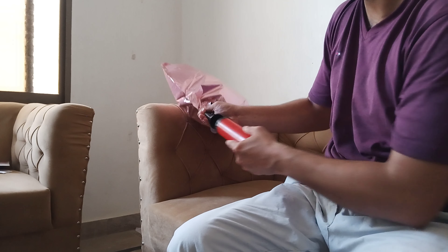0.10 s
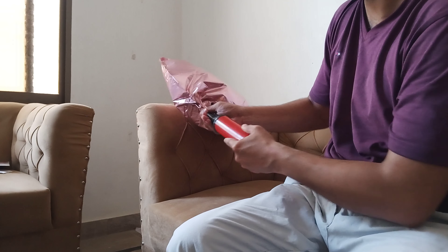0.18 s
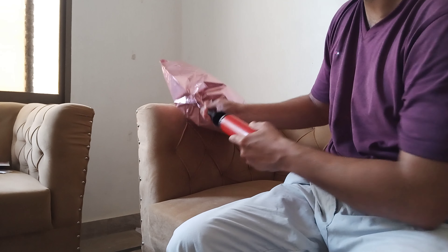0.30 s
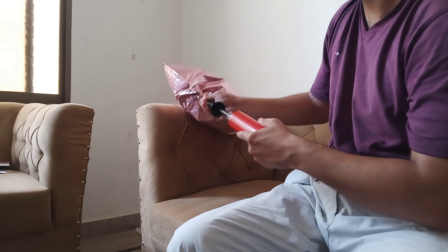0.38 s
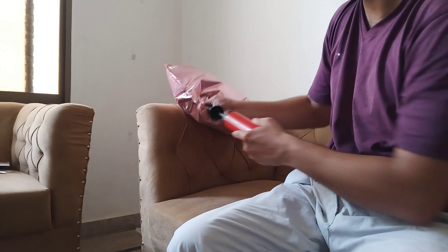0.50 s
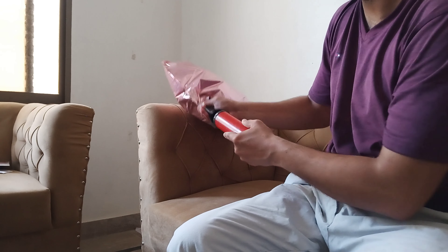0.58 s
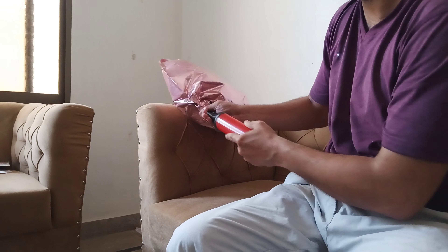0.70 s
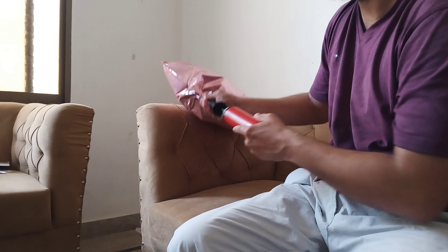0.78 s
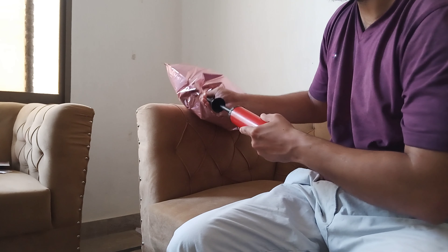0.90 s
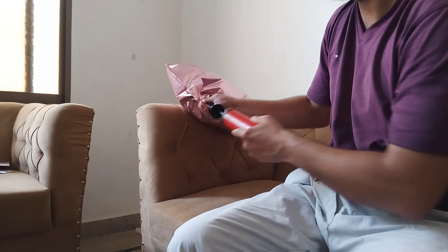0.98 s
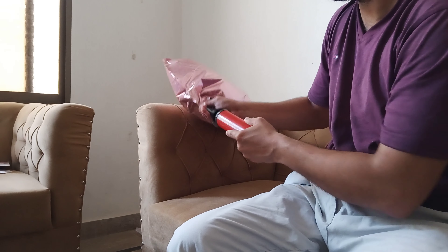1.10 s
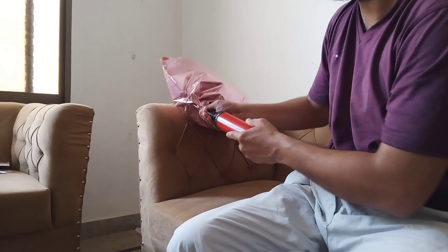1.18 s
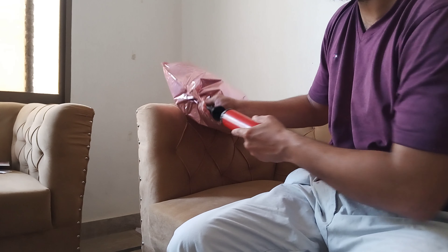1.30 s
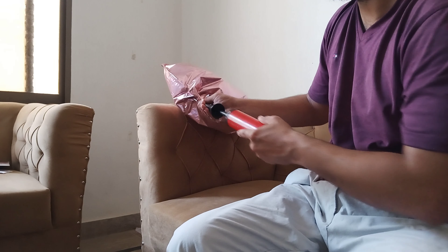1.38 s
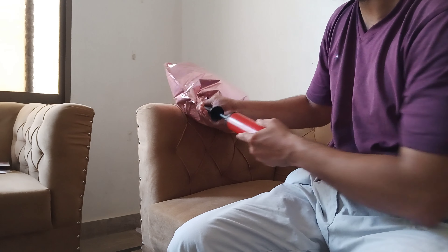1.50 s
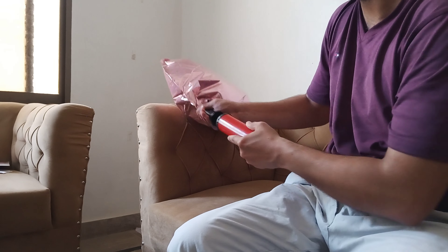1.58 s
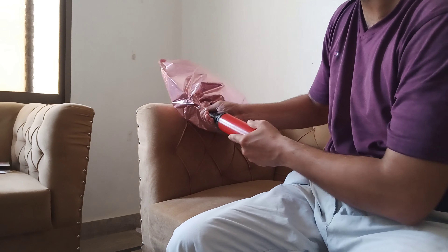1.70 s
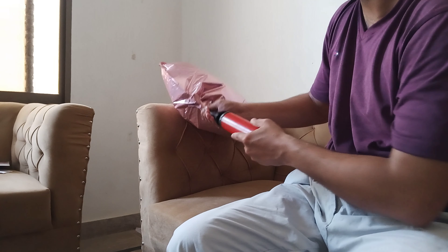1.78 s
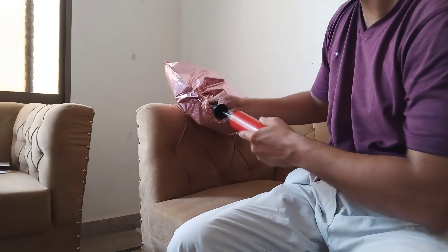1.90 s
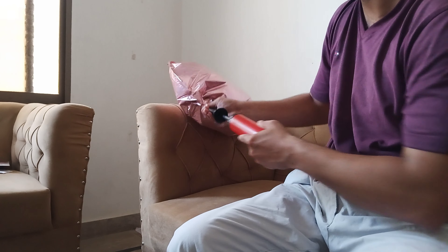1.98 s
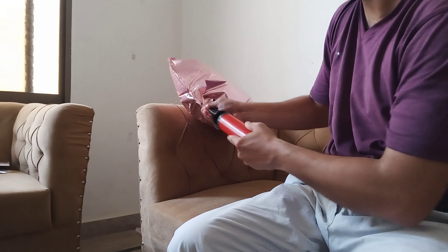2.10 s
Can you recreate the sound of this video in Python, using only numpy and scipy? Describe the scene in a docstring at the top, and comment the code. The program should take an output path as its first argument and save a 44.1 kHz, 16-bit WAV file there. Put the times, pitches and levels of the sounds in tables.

```python
"""A quiet living room, where a plastic hand pump fills a foil balloon at about two strokes a second.
Each push opens the valve: shaped noise rushes through the hollow balloon, with a pop and a late buffet.
Each pull draws a softer hiss. The piston clacks as it turns round, the seal scrapes, and rod, foil and
hands tick and knock. The room adds a short wash and its still air; both channels are alike."""
import sys
import numpy as np
from scipy import signal
from scipy.fft import rfft, irfft
from scipy.io import wavfile
from scipy.ndimage import uniform_filter1d

SR = 44100
rng = np.random.default_rng(int(sys.argv[2]) if len(sys.argv) > 2 else 0)


def wav_record(signal):
    """Record a signal, one row per channel, as 16-bit PCM in the file named by sys.argv[1]."""
    frames = np.transpose(np.atleast_2d(signal))
    bounded = np.clip(frames, -1, 1)
    # unit amplitude maps onto the largest positive 16-bit level
    quanta = np.round(bounded * 32767).astype(np.int16)
    wavfile.write(sys.argv[1], SR, quanta)


N = 94815

# Resonances and dips of the air in nozzle and balloon, before each use scales their depth:
# [f/Hz, width/Hz, lift/dB]
HOLLOW = [(593, 79, 4.5), (792, 33, 9), (1001, 20, -5), (1155, 100, -15), (1203, 80, 10.5),
          (1320, 80, -4.5), (1592, 63, 4.5), (2010, 31, 5), (2280, 140, 6), (2710, 240, 0.5),
          (3270, 420, 6), (3480, 40, -13.5), (4010, 270, 2), (4100, 100, 0.5)]
# Relative spectrum of air drawn in or slipping past the seal: [f/Hz, density/dB per Hz]
INTAKE = [(180, -53), (300, -24), (331, -16), (658, -16), (801, -10.5), (991, -10), (1090, -13.5),
          (2250, -9), (3670, -8), (3980, -6), (6100, -0.5), (7060, -3.5), (8190, -14), (13400, -26),
          (15000, -6)]


def undb(db):
    """Decibels to gain."""
    return 10 ** (np.asarray(db) / 20)


def times():
    """Time of each sample in seconds."""
    return np.arange(N) / SR


def freqs():
    """Frequency of each spectral bin in Hz, at least 1."""
    return np.maximum(np.arange(N // 2 + 1) * SR / N, 1)


def slope(points):
    """Spectrum in dB through (Hz, dB) points, falling 12 dB per octave below the first."""
    hz, db = np.array(points).T
    octaves_below = np.maximum(np.log2(hz[0] / freqs()), 0)
    return np.interp(np.log(freqs()), np.log(hz), db) - 12 * octaves_below


def bumps(rows, ratio=1):
    """Spectrum in dB of a set of resonances, shifted by a pitch ratio."""
    return sum(db * np.exp(-2 * ((freqs() - hz * ratio) / width) ** 2) for hz, width, db in rows)


def band(hz, octaves):
    """Spectrum in dB of one broad resonance, 6 dB down the given octaves either side."""
    return -20 * np.log10(1 + (np.log2(freqs() / hz) / octaves) ** 2)


def noise(db):
    """Noise of rms 1 with the given spectrum."""
    x = irfft(rfft(rng.standard_normal(N)) * undb(db), N)
    return x / x.std()


def swell(at, before, after):
    """Bell-shaped rise and fall around a moment, with a spread in seconds for each side."""
    u = times() - at
    return np.exp(-.5 * (u / np.where(u < 0, before, after)) ** 2)


def above(x, hz):
    """Steep high-pass."""
    return signal.sosfilt(signal.butter(4, hz, "high", fs=SR, output="sos"), x)


def turbulence():
    """Quick small random changes of gain in a stream of air."""
    flutter_db, flutter_hz = 0.42, 69  # rms; 6 dB corner of the gain's own spectrum
    return undb(flutter_db * noise(-20 * np.log10(1 + (freqs() / flutter_hz) ** 2)))


def still_air():
    """The room at rest: steady noise, mostly low."""
    # Relative spectrum of the quiet room: [f/Hz, density/dB per Hz]
    room_tone = [(25, -26), (48, -11), (68, 0), (110, -3.5), (165, 1), (260, -4), (500, -8), (1500, -12.5),
                 (6000, -12), (10000, -27), (15000, -48)]
    level_db = -46.5
    return undb(level_db) * noise(slope(room_tone))


def pulls():
    """The intake hisses with the speed of the returning piston, a half sine; a little air seeps all along."""
    # Return strokes: [start t/s, end t/s, level/dB at full speed before easing]
    return_strokes = [(-.04, 0.15, -27), (0.417, 0.62, -27), (0.904, 1.128, -32), (1.413, 1.654, -37),
                      (1.94, 2.163, -26.5)]
    power, ease_s = 0.97, 0.059  # hiss against piston speed; the hand eases into each turn
    hollow_share = 0.29  # of the resonances' depth
    # A thin hiss lingers between strokes and slowly fades
    seep_db, seep_peak_s, seep_s = -38, 0.19, 0.8

    flow = undb(seep_db) * swell(seep_peak_s, seep_s, seep_s)
    for start, end, db in return_strokes:
        speed = np.sin(np.pi * np.clip((times() - start) / (end - start), 0, 1))
        hiss = uniform_filter1d(abs(speed) ** power, int(ease_s * SR) + 1)
        flow = np.hypot(flow, undb(db) * hiss)
    air = noise(slope(INTAKE) + hollow_share * bumps(HOLLOW))
    return flow * turbulence() * air


def clacks():
    """The plastic barrel rings for a few milliseconds when the piston changes direction."""
    # Turns of the piston: [t/s, peak level/dB, pitch ratio]
    turns = [(0.1571, -16, 1.03), (.6345, -18.5, 0.965)]
    # Modes of the barrel, before the pitch ratio: [f/Hz, 60 dB decay t/s, level/dB]
    barrel_modes = [(1613, 0.014, 1.5), (1910, .014, -7), (3480, 0.0086, -1.5), (6100, .006, -7)]
    attack_s, low_cut_hz = 0.00045, 1080

    out = np.zeros(N)
    for at, db, ratio in turns:
        u = np.maximum(times() - at, 0)
        ring = np.zeros(N)
        for hz, t60, mode_db in barrel_modes:
            ring += undb(mode_db - 60 * u / t60) * np.sin(2 * np.pi * hz * ratio * u)
        ring = above(ring * (1 - np.exp(-u / attack_s)), low_cut_hz)
        out += undb(db) * ring / abs(ring).max()
    return out


def scrapes():
    """The seal rubs along the barrel: one band of noise that swells and fades."""
    # Rubs of the seal: [middle t/s, level/dB, spread t/s]
    rubs = [(0.19, -39, 0.025), (0.22, -28, 0.0033), (0.644, -46, 0.065), (1.216, -30, 0.0033)]
    hz, octaves = 1780, 0.42
    envelope = sum(undb(db) * swell(at, spread, spread) for at, db, spread in rubs)
    return envelope * noise(band(hz, octaves))


def pushes():
    """Air leaks, the valve pops open, the jet sounds the balloon's hollow, then dulls and dies as the arm slows."""
    # Push strokes: [valve opens t/s, level/dB, rise t/s, fall begins t/s after opening, fall/dB per s,
    # valve shuts t/s, resonance pitch ratio, resonance depth ratio, pop f/Hz, leak level/dB]
    push_strokes = [(0.217, -8.5, 0.023, 0.089, 190, .425, 0.96, 0.69, 580, -27),
                    (0.703, -11, 0.012, .120, 260, .92, 1.03, 0.55, 794, -29),
                    (1.213, -11, 0.02, 0.096, 174, 1.416, 1.0, 1.09, 767, -31.5),
                    (1.728, -11.5, 0.016, 0.094, 225, 1.988, 1.042, 0.48, 594, -31.5)]
    # Relative spectrum of the jet before its hollow: [f/Hz, density/dB per Hz]
    rush = [(88, -52), (150, -16), (200, -27), (243, -11), (364, -19), (787, -5.5), (1010, -4),
            (1130, -7.5), (1570, -4.5), (1770, -6.5), (2180, -6.5), (3090, -7.5), (6550, -0.5),
            (8250, -11.5), (11700, -20.5), (13600, -19.5), (15000, -5)]
    knee_s, shut_s = 0.017, 0.0027  # rounding of the fall; closing of the valve
    jet_low_hz = 340  # the fast jet has little bass
    treble_hz, treble_power = 8000, 1.27  # the top of the jet grows faster than the flow
    # Hollow pop of the opening valve, relative to the push
    pop_db, pop_lag_s, pop_rise_s, pop_fall_s, pop_octaves = -21.5, 0.012, 0.0032, 0.0078, 0.14
    # Low flutter late in a push, relative to it
    buffet_db, buffet_hz, buffet_octaves = -25, 406, 1
    buffet_lag_s, buffet_rise_s, buffet_fall_s = 0.0046, 0.0088, 0.047
    leak_lead_s, leak_s = 0.00082, 0.017  # air slips past the seal as pressure builds

    out = np.zeros(N)
    for start, db, rise, hold, fall, shut, ratio, depth, pop_hz, leak_db in push_strokes:
        u = np.maximum(times() - start, 0)
        slowing = undb(-fall * knee_s * np.logaddexp(0, (u - hold) / knee_s))
        valve = (1 - np.tanh((times() - shut) / shut_s)) / 2
        flow = (1 - np.exp(-u / rise)) * slowing * valve

        air = above(noise(slope(rush) + depth * bumps(HOLLOW, ratio)), jet_low_hz)
        body = irfft(rfft(air) / (1 + (freqs() / treble_hz) ** 4), N)
        treble = air - body
        jet = flow * body + flow ** treble_power * treble

        pop = swell(start + pop_lag_s, pop_rise_s, pop_fall_s) * noise(band(pop_hz, pop_octaves))
        buffet = swell(start + hold + buffet_lag_s, buffet_rise_s, buffet_fall_s)
        buffet = buffet * noise(band(buffet_hz, buffet_octaves))
        leak = swell(start - leak_lead_s, leak_s, leak_s) * noise(slope(INTAKE))
        out += undb(db) * (jet + undb(pop_db) * pop + undb(buffet_db) * buffet)
        out += undb(leak_db) * leak
    return out * turbulence()


def taps(rows, t60, octaves):
    """Short contacts: noise bursts that die away at once, each in its own band."""
    out = np.zeros(N)
    for at, db, hz in rows:
        u = times() - at
        decay = (u > 0) * undb(-60 * np.maximum(u, 0) / t60)
        burst = decay * noise(band(hz, octaves))
        out += undb(db) * burst / abs(burst).max()
    return out


def knocks():
    """Dull knocks of the pump in the hands: broad bursts that die in a tenth of a second."""
    # Knocks: [t/s, peak level/dB before the low cut, centre f/Hz]
    hand_knocks = [(.584, -29.5, 490), (.589, -31.5, 900), (1.152, -36, 218), (1.158, -35, 1150),
                   (2.125, -30.5, 1320), (2.128, -28.5, 240)]
    t60_s, octaves, low_cut_hz = 0.099, 0.88, 144
    return above(taps(hand_knocks, t60_s, octaves), low_cut_hz)


def ticks():
    """Small ticks of rod and foil: narrow bursts a few milliseconds long."""
    # Ticks: [t/s, peak level/dB, centre f/Hz]
    small_ticks = [(1.137, -35, 3500), (1.149, -27, 3850), (1.195, -37, 5700), (1.673, -25, 5130),
                   (1.691, -27, 5550)]
    t60_s, octaves = 0.0073, 0.21
    return taps(small_ticks, t60_s, octaves)


def room(x):
    """A short wash of reflections from walls and furniture: decaying noise after a brief gap."""
    t60_s, wash_db, gap_s = 0.28, -9.5, 0.0031
    decay = np.exp(-np.log(1000) * times() / t60_s)
    tail = rng.standard_normal(N) * decay * (times() > gap_s)
    wash = signal.fftconvolve(x, tail / np.linalg.norm(tail))[:N]
    return x + undb(wash_db) * wash


def scene():
    """Pump and balloon in the room, over its still air, the same in both channels."""
    handling = clacks() + scrapes() + knocks() + ticks()
    mono = room(pulls() + pushes() + handling) + still_air()
    return np.array([mono, mono])


def record(dry):
    """The microphone lifts part of the treble, dips above it and cuts off steeply at the top."""
    # Microphone response: [f/Hz, width/Hz, lift/dB]
    mic_response = [(6660, 1100, 2.5), (13550, 2500, -4), (15100, 830, -6.5)]
    top_hz = 15480
    coloured = irfft(rfft(dry) * undb(bumps(mic_response)), N)
    return signal.sosfilt(signal.ellip(14, .2, 80, top_hz, fs=SR, output="sos"), coloured)


dry = scene()
out = record(dry)
wav_record(out)
```